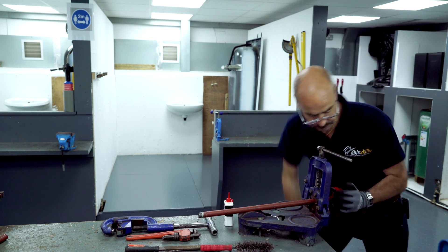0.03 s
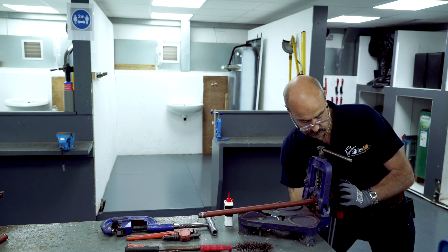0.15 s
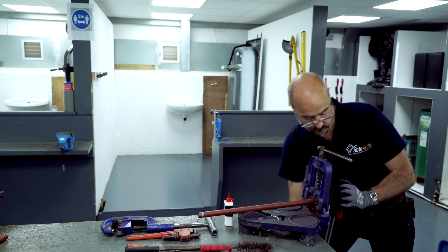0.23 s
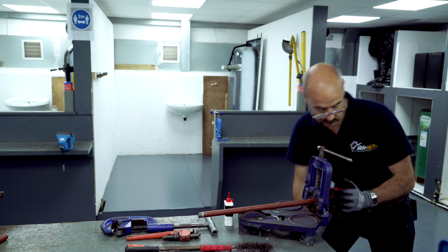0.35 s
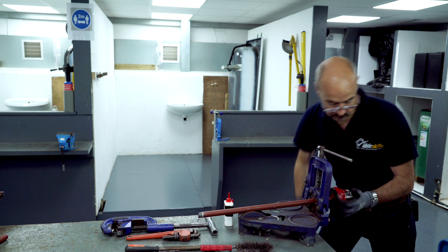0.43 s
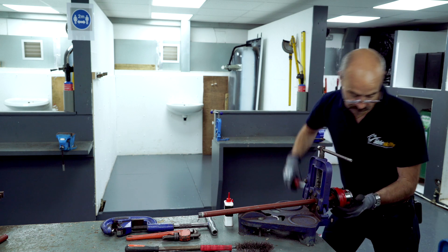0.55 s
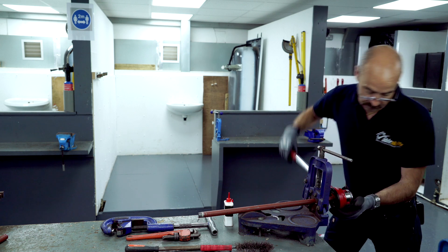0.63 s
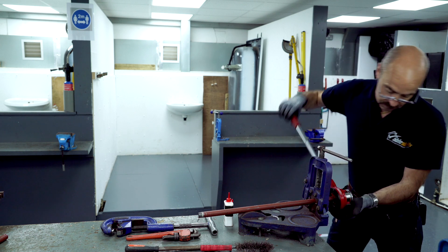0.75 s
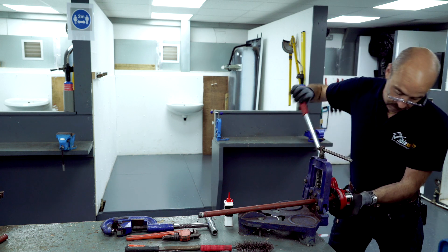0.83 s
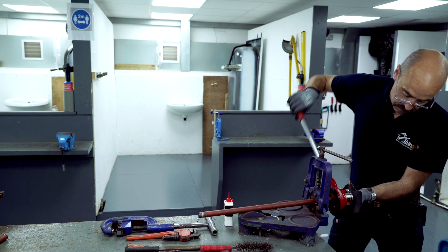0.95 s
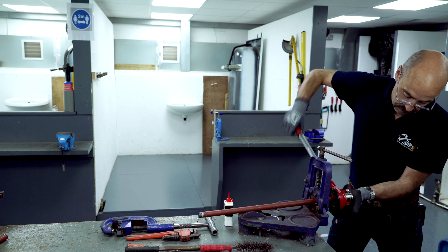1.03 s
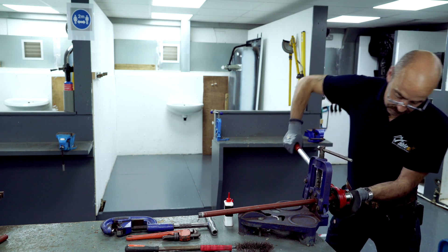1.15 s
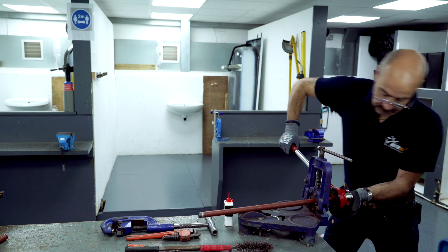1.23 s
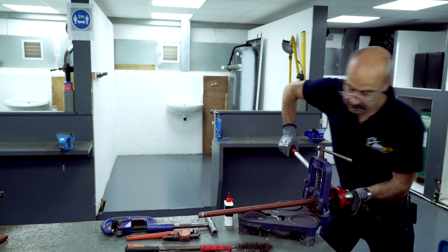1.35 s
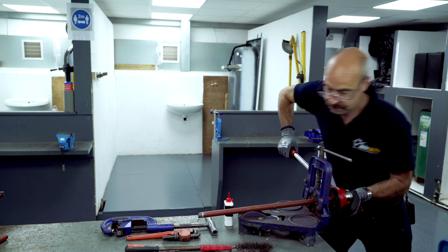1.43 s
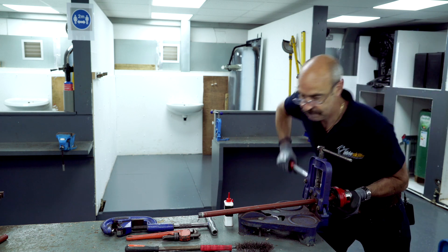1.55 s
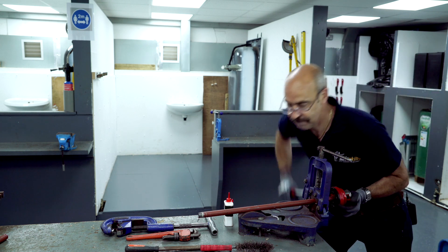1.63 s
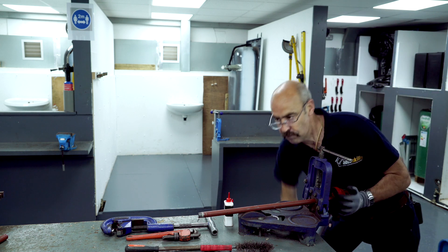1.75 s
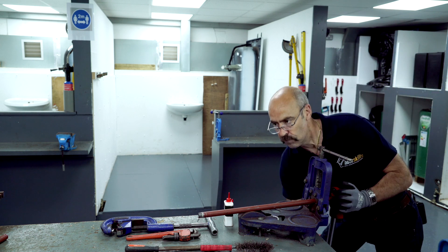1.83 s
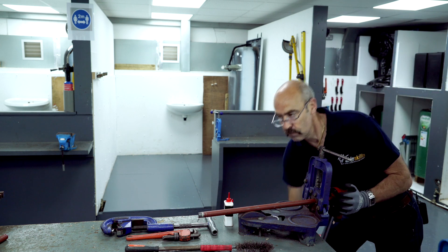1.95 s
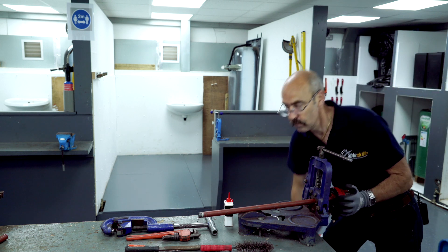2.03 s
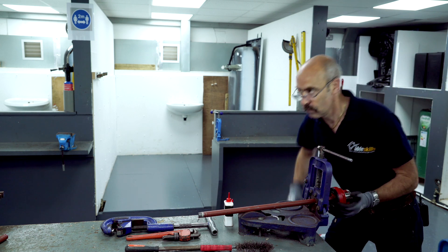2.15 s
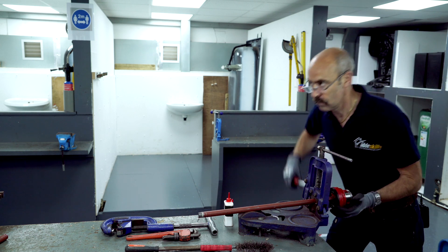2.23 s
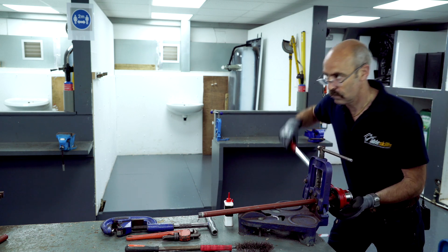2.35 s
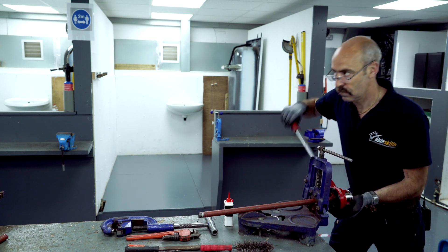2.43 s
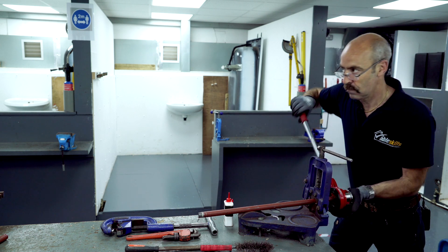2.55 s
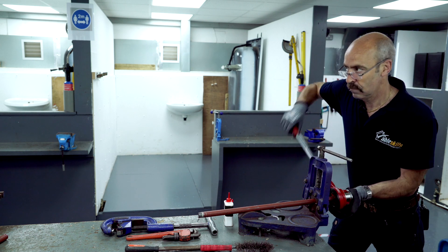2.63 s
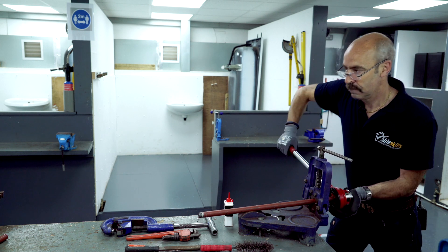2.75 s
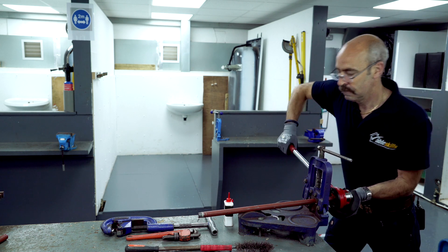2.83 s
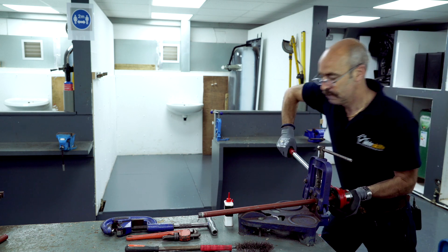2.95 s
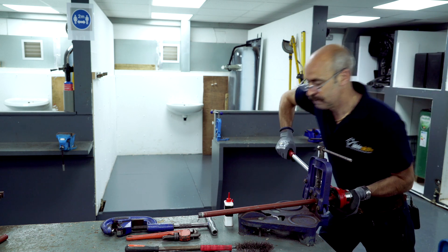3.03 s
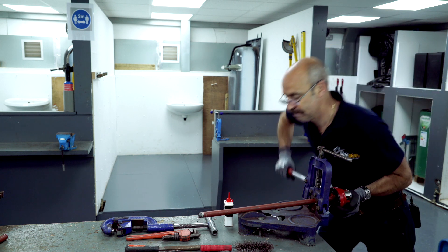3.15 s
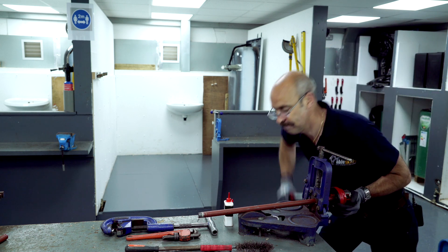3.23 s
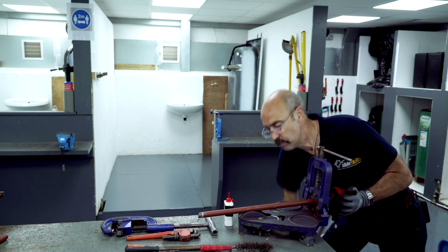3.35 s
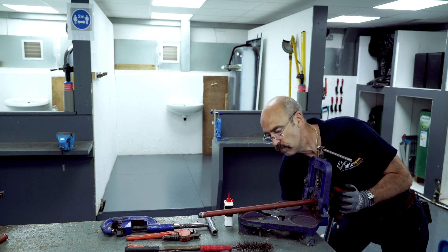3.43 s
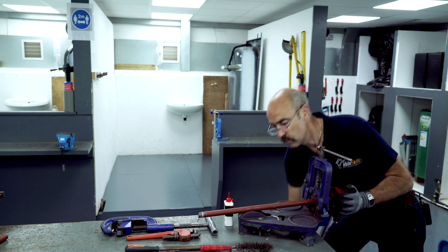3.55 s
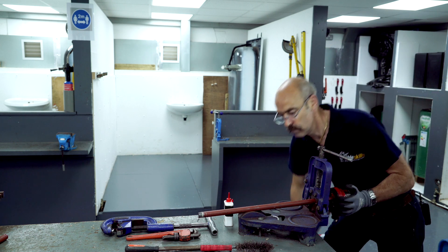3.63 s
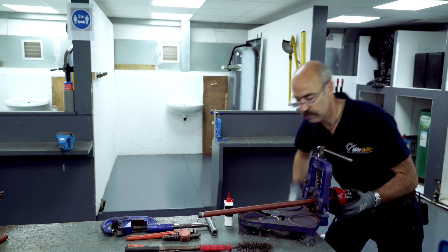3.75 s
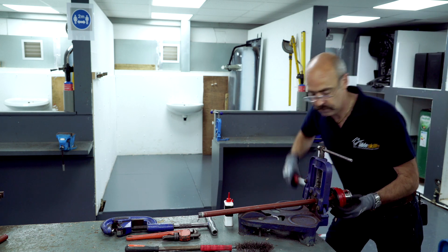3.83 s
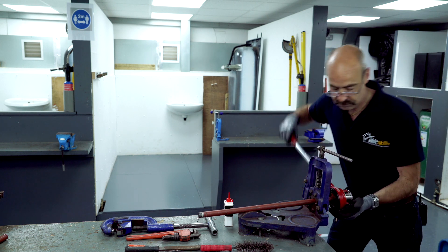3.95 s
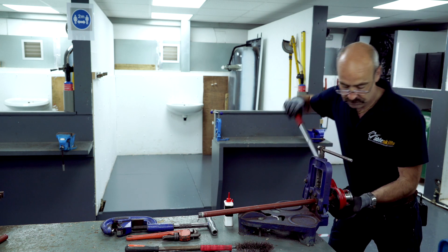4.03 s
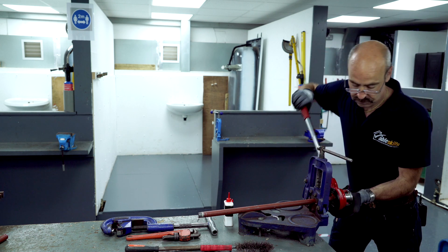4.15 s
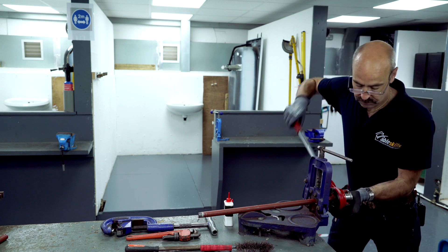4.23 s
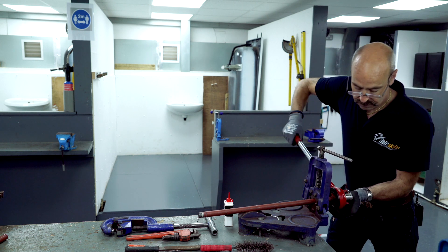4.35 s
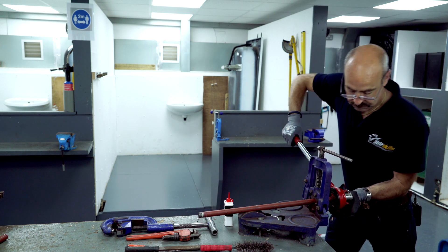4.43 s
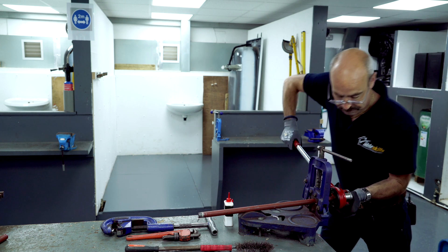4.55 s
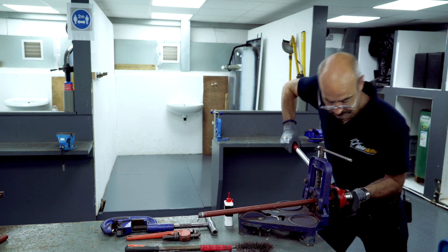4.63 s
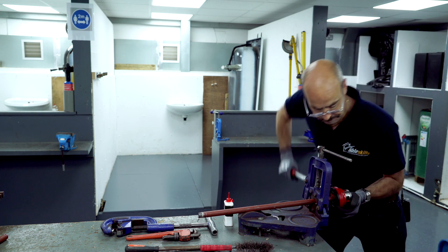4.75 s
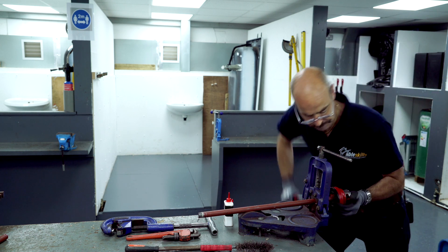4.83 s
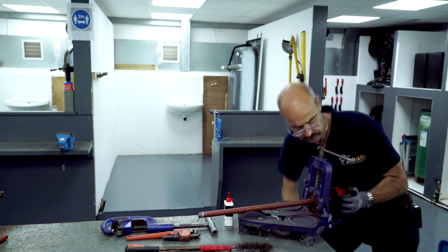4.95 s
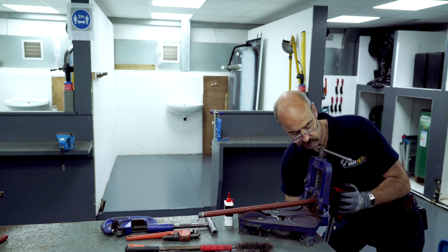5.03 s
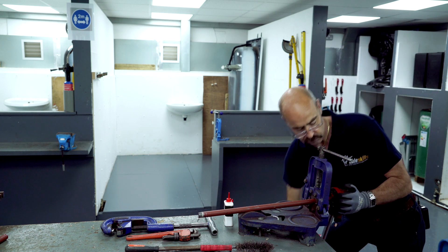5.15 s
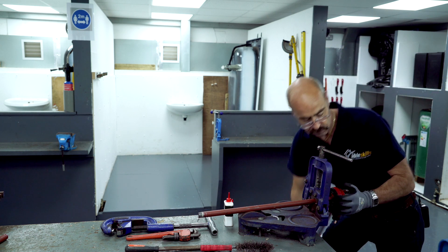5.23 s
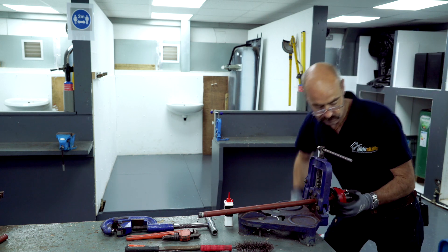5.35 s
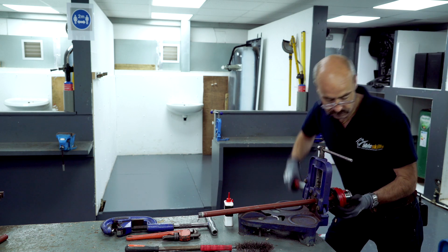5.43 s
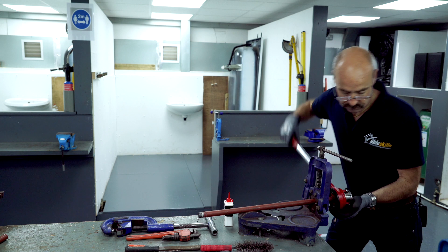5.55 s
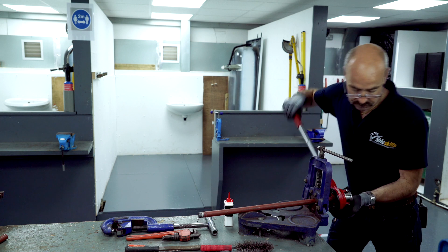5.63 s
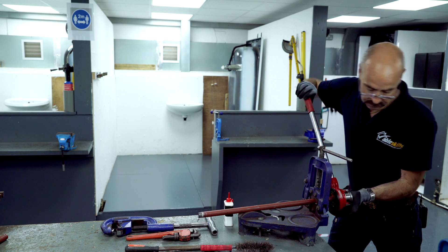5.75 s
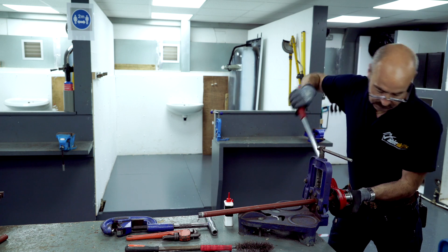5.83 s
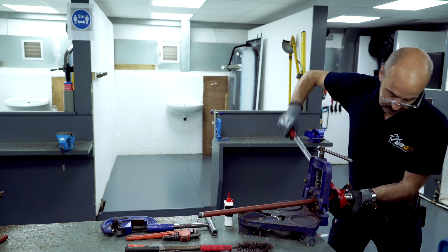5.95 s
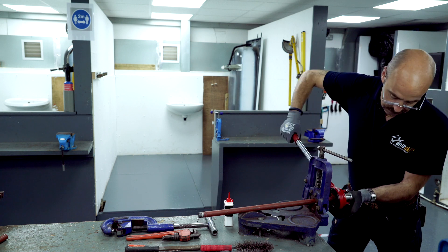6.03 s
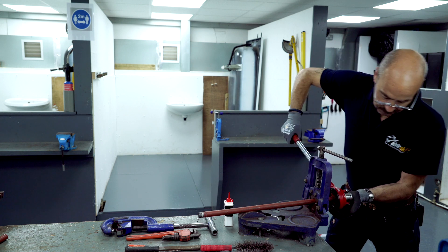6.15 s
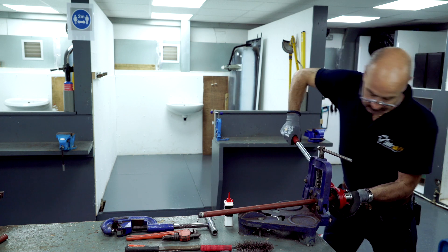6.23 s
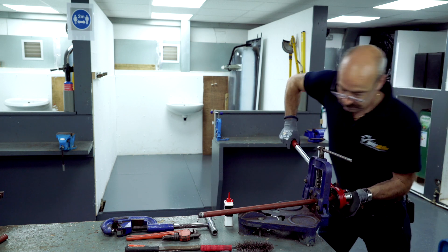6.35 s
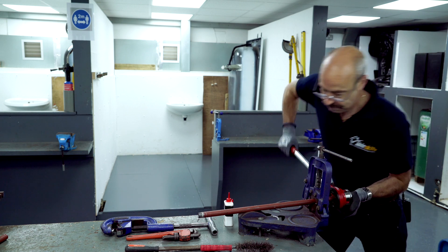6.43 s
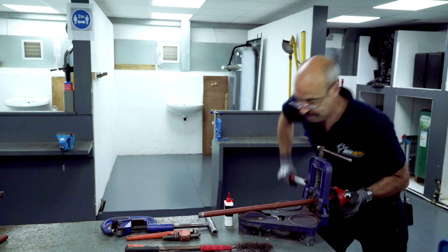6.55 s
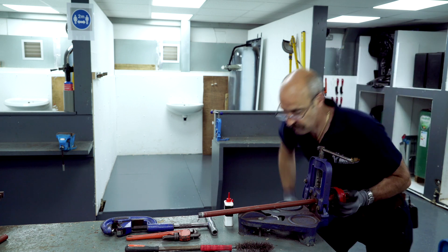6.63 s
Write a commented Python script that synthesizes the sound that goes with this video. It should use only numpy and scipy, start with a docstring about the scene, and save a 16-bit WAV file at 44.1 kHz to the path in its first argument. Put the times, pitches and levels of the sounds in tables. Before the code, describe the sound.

Loud steel ratchet clacks come in quick bursts of four, separated by loose handle knocks and quieter grinding scrapes as a pipe thread is cut.

```python
"""A ratchet die stock is worked on a steel pipe held in a stand vice in a hard-walled workshop.
A pull is already under way and is soon let go; the loose handle and stand knock as it turns round.
Four back strokes follow, each with four loud pawl snaps that ring the steel head (two add a faint fifth).
Friction noise scrapes and grinds in the pulls between; short bright noise ticks are scattered through all.
A last pull bites near the end; hiss, stand rumble, deep hum and a thin electrical whine lie below throughout."""
import sys
import numpy as np
from scipy import signal
from scipy.fft import rfft, irfft
from scipy.io import wavfile

SR = 44100
rng = np.random.default_rng(int(sys.argv[2]) if len(sys.argv) > 2 else 0)


def inscribe(sig):
    """Save sig as 16-bit PCM at rate SR to the path in sys.argv[1].

    A 1-D sig is mono; a 2-D sig holds one channel per row.
    Samples are clipped to [-1, 1] before scaling.
    """
    pcm = np.round(np.clip(np.atleast_2d(sig).T, -1, 1) * 32767)
    wavfile.write(sys.argv[1], SR, pcm.astype(np.int16))


def invert_db(level):
    """Linear amplitude ratio for a level in decibels (20 dB per decade), elementwise."""
    return 10 ** (np.asarray(level, dtype=float) / 20)


N = 295029


def rms_one(x):
    """Scale to unit rms."""
    return x / np.sqrt(np.mean(x ** 2) + 1e-20)


def in_time(rows):
    """Join curve rows by straight lines, one array per column; -120 outside the rows."""
    s, *columns = np.transpose(rows)
    return [np.interp(np.arange(N) / SR, s, c, left=-120, right=-120) for c in columns]


def drift(rate_hz):
    """Slow random wander of rms 1: noise through a double low-pass, made at every 40th sample."""
    r = np.exp(-80 * np.pi * rate_hz / SR)
    slow = signal.lfilter([1], [1, -2 * r, r * r], rng.standard_normal(N // 40 + 2002))
    slow = slow[2000:]     # skip the filter's start-up
    return np.interp(np.arange(N) / 40, np.arange(len(slow)), rms_one(slow))


def coloured(spectrum):
    """Noise of rms 1 shaped to the given relative dB per Hz."""
    hz, level_db = np.transpose(spectrum)
    log_hz = np.log(np.fft.rfftfreq(N, 1 / SR) + 1)
    gain = invert_db(np.interp(log_hz, np.log(hz), level_db))
    return rms_one(irfft(rfft(rng.standard_normal(N)) * gain, N))


def ring(x, hz, t60):
    """Two-pole resonator: a unit click sets a sine of height 1 ringing, 60 dB down after t60."""
    r, w = invert_db(-60 / (t60 * SR)), 2 * np.pi * hz / SR
    return signal.lfilter([0, np.sin(w)], [1, -2 * r * np.cos(w), r * r], x + 1e-18)


def band(x, low_hz, high_hz):
    """Band-pass."""
    edges_hz = [low_hz, min(high_hz, .45 * SR)]
    return signal.sosfilt(signal.butter(2, edges_hz, "band", fs=SR, output="sos"), x)


def dying(t60, rise_s, size):
    """A burst of noise that rises fast and dies away."""
    t = np.arange(size) / SR
    return rng.standard_normal(size) * (1 - np.exp(-t / rise_s)) * invert_db(-60 * t / t60)


def add(out, s, sound):
    """Mix a sound in at a time."""
    i = round(s * SR)
    out[i:i + len(sound)] += sound[:N - i]


# Pawl snaps. Each row: start in seconds, nominal level in dB, favoured head mode in Hz,
# stand thud and treble ring in dB against that level.
SNAP_ROWS = [(0.534, -1, 3180, -18, -2), (0.634, -4.5, 3680, -16, 2.5), (0.725, -5, 3290, -12, 0.5),
             (0.816, -7.5, 3708, -11.5, -3.5), (1.076, -13.5, 3110, -21, -12.5),
             (2.216, 2, 3309, -21, -5.5), (2.314, -4, 3690, -13, 0), (2.416, -1, 2960, -21.5, -5.5),
             (2.514, -2.5, 3336, -22, -3.5), (3.832, -1.5, 3400, -18.5, -5.5), (3.929, -5, 3697, -14.5, 1),
             (4.019, 1, 2986, -18.5, -6.5), (4.111, -1, 3234, -28, -1), (5.451, 2.5, 2808, -18, -8),
             (5.544, -3.5, 3827, -13.5, -3.5), (5.63, -3, 2770, -12, -2), (5.719, 0.5, 3234, -17, -5),
             (5.941, -17, 3200, -9.5, -9)]
# Steel modes of the die head. Each row: pitch in Hz, weight in dB, ring time t60 in seconds.
HEAD_MODES = [(555, 0, .04), (1100, -2, .03), (1290, 0, .03), (1650, -1, .02), (2170, -12, .02),
              (2530, -7, .02), (2780, -6, .02), (3050, -4, .022), (3180, -4, .05), (3300, -5, .03),
              (3450, -7, .02), (3700, -8, .02), (4250, -11, .012), (5450, -22, .04), (6350, -22, .012),
              (7500, -12, .012), (8120, -10, .012), (8780, 4, .018), (9250, -4, .012), (10050, -9, .01),
              (11700, -12, .012), (13050, -2, .022), (13650, -8, .012), (14260, -12, .012),
              (14800, -5, .02), (15270, -11, .01)]
# The four parts of a snap, low to high. Each row: crack band from Hz, to Hz, crack in dB,
# ringing echo in dB, plain echo in dB, echo t60 in seconds.
SNAP_PARTS = [(714, 4100, 15, -28.5, -22.5, 0.2), (2060, 3540, 12.5, -35, -17, 0.25),
              (7330, 10160, 6, -39.5, -28.5, 0.25), (12000, 13500, 9.5, -35.5, -28, 0.2)]
# Borders in Hz that deal the head modes out to the four parts.
MODE_BORDERS_HZ = [400, 1900, 5000, 11000, 16000]
BODY_DB, TOP_UNDER_TREBLE_DB = -8, 7   # second part against the snap; highest part below the treble ring


def pawl(size=12000):
    """Each snap cracks and rings the head; the walls return a dense dying echo, part through the same modes."""
    out, click = np.zeros(N), np.arange(size) == 0
    for s, snap_db, favoured_hz, thud_db, treble_db in SNAP_ROWS:
        slip = band(dying(0.06, 0.00087, size), 1200, 3000)     # the pawl slips off the crest first
        add(out, s - .011, invert_db(snap_db - 23.5) * slip)
        levels = thud_db, BODY_DB, treble_db, treble_db - TOP_UNDER_TREBLE_DB
        spans = zip(MODE_BORDERS_HZ, MODE_BORDERS_HZ[1:])
        for (low, high), part, level_db in zip(spans, SNAP_PARTS, levels):
            *crack_hz, crack_db, ringing_db, plain_db, echo_t60 = part
            blow = click + invert_db(ringing_db) * dying(echo_t60, 0.0009, size)
            crack = invert_db(crack_db) * dying(0.0085, 0.00055, size)
            plain_echo = invert_db(plain_db) * dying(echo_t60, 0.013, size)
            sound = band(crack + plain_echo, *crack_hz)
            for hz, mode_db, ring_s in HEAD_MODES:
                if not low <= hz < high:
                    continue
                # the seat of the tooth favours nearby modes
                near_db = 9 * np.exp(-((hz - favoured_hz) / 280) ** 2)
                seated_hz = hz * (1 + rng.normal(0, .005))     # the grip on the pipe detunes the head a little
                luck_db = rng.normal(0, 3.5)     # no two blows strike a mode alike
                gain = invert_db(mode_db + near_db + luck_db - 10) * rng.choice([-1, 1])
                sound += gain * ring(blow, seated_hz, ring_s)
            add(out, s, invert_db(snap_db + level_db) * sound)
    return out


# Knocks of handle and stand at the turn-rounds. Each row: moment in seconds, nominal level in dB,
# thud pitch in Hz, rattle weight in dB.
KNOCK_ROWS = [(0.37, -16.5, 570, -28), (0.419, -20.5, 344, -25), (0.453, -36, 334, -18),
              (0.461, -28, 511, -18), (0.469, -29.5, 325, -12), (0.998, -25.5, 613, -16),
              (1.081, -29, 580, -1), (1.101, -22, 606, -10.5), (1.132, -29, 890, -13),
              (1.169, -22, 643, -19.5), (1.199, -21, 1090, -19), (1.531, -50, 501, -17),
              (1.969, -34.5, 380, -22), (1.987, -31, 764, -17.5), (2.003, -26.5, 720, -21),
              (2.011, -22, 396, -41), (2.035, -22.5, 660, -15), (2.076, -26.5, 630, -16.5),
              (2.131, -18, 598, -34), (2.154, -24, 413, -11.5), (2.693, -21.5, 1150, -16.5),
              (2.746, -23, 606, -17.5), (2.783, -20, 454, -29.5), (3.149, -38, 530, -31),
              (3.601, -26.5, 675, -15.5), (3.637, -29, 444, -28), (3.653, -25, 388, -18),
              (3.672, -19.5, 570, -18), (3.685, -32, 596, -13), (3.695, -31, 377, -2),
              (3.717, -18, 346, -16), (3.766, -26, 380, -11.5), (4.27, -25.5, 670, -28),
              (4.297, -44.5, 640, 0), (4.349, -23.5, 665, -21), (4.365, -24.5, 358, -20.5),
              (4.707, -44.5, 790, -3), (5.215, -20, 463, -22), (5.288, -34.5, 582, -12.5),
              (5.296, -28, 328, -18), (5.321, -50, 310, 6), (5.349, -20.5, 584, -21.5),
              (5.367, -29.5, 644, -9.5), (5.393, -27, 523, -6), (5.801, -29, 454, -23),
              (5.892, -26.5, 650, -11), (5.907, -24.5, 860, -15), (6.026, -25.5, 570, -30)]
# the handle rebounds in its slack after every snap; its level is against the snap
REBOUND_S, REBOUND_DB, REBOUND_THUD_HZ, REBOUND_RATTLE_DB = 0.038, -28, 570, -4.5


def knocks(size=5000):
    """Loose contacts: a rough push thuds in the stand, a short tick rattles a few middle modes of the head."""
    out, middle = np.zeros(N), [hz for hz, *_ in HEAD_MODES if 1500 < hz < 3500]
    rebounds = []
    for s, snap_db, *_ in SNAP_ROWS:
        moment = s + REBOUND_S + rng.normal(0, .002)
        thud_hz = REBOUND_THUD_HZ * rng.uniform(.65, 1.6)
        rebounds.append((moment, snap_db + REBOUND_DB, thud_hz, REBOUND_RATTLE_DB))
    for s, knock_db, thud_hz, rattle_db in KNOCK_ROWS + rebounds:
        push, tick = dying(0.07, 0.0047, size), dying(0.024, 0.0003, size)
        thud = 0.064 * ring(push, thud_hz, 0.03) + band(push, 290, 1100)
        rung = sum(ring(tick, hz, 0.0058) for hz in rng.choice(middle, size=3))
        tail = invert_db(-14) * dying(0.23, 0.013, size)
        rattle = 0.092 * rung + 1.2 * tick + tail
        rattle = band(band(rattle, 730, 3500), 730, 7900)     # blunt contacts carry little treble
        add(out, s - .001, invert_db(knock_db) * (thud + 2.2 * invert_db(rattle_db) * rattle))
    return out


# Pulls on the handle. Each row: dies bite, hardest moment and let go in seconds,
# scrape in dB at the hardest, bite in dB against that.
PULL_ROWS = [(-.2, .13, 0.21, -42, -9.5), (1.6, 1.797, 1.895, -40, -13.5), (3.16, 3.367, 3.46, -43, -15.5),
             (4.715, 4.983, 5.08, -43.5, -10), (6.505, 6.722, 6.67, -44.5, -11.5)]
SCRAPE_TOP_DB = np.array(PULL_ROWS)[:, 3:4]
BITE_S, RELEASE_S = .05, .07   # ramp into the bite and ramp after letting go
LET_GO_DB, IDLE_DB = -7, -32   # effort against the hardest moment


def pulls():
    """Effort of each pull in dB: bite, build up to the hardest, ease to the let-go, drop away."""
    efforts = []
    for bite, hard, go, _, bite_db in PULL_ROWS:
        curve = [(bite - BITE_S, IDLE_DB), (bite, bite_db), (hard, 0), (go, LET_GO_DB), (go + RELEASE_S, IDLE_DB)]
        efforts.append(in_time(curve)[0])
    return np.array(efforts)


def swell(start, end, rise, fall):
    """0 dB from start to end, sloping away on both sides at so many dB per second."""
    t = np.arange(N) / SR
    return np.minimum(0, np.minimum(rise * (t - start), fall * (end - t)))


# Resonances the scrape excites in pipe and stand. Each row: pitch in Hz,
# spread in Hz (t60 is 4.3 / spread), weight per Hz of spread in dB.
PIPE_MODES = [(394, 73, -1), (537.5, 11.3, 3.5), (751, 146, -2.5), (891.6, 30, 2.5), (1090, 38, -2),
              (1268, 79, -2.5), (1510, 250, -30.5), (2044, 67, -8), (2410, 50, -20), (3620, 450, -24)]


def scrape():
    """Rough friction of the dies: flickering noise rings the pipe resonances, louder with effort."""
    scrape_db = np.max(SCRAPE_TOP_DB + pulls(), axis=0)
    rub = rng.standard_normal(N) * invert_db(1.4 * drift(40) + 2.3 * drift(210))
    rung = np.zeros(N)
    for k, (hz, spread, level_db) in enumerate(PIPE_MODES):
        mode = rms_one(ring(rub, hz, 4.3 / spread)) * np.sqrt(spread)
        rung += (-1) ** k * invert_db(level_db + 3.5 * drift(6.2)) * mode
    rough = rms_one(rms_one(rung) + 0.354 * rms_one(band(rub, 380, 1900)))
    return invert_db(scrape_db) * rough


# Colour of the bright grind and the slide. Each row: frequency in Hz, relative level in dB per Hz.
GRIND_COLOUR = [(1470, -27.5), (2500, -17), (3180, -9.5), (3720, 3), (7650, -1), (8530, 0.5), (15000, -8.5),
                (16000, -9)]
# Back strokes. Each row: start and end in seconds, stand rumble in dB, pawl slide hiss in dB.
RETURN_ROWS = [(0.379, 1.21, -49, -47.5), (1.989, 2.81, -50.5, -52.5), (3.635, 4.423, -47.5, -48.5),
               (5.274, 6.05, -48.5, -49.5)]
GRIND_DB, GRIND_FOLLOWS = -15, 1.1   # grind against the scrape; how steeply it follows effort
FASTEST_AFTER_S = .37   # the swing is fastest so long after its start
SLIDE_RISE_DB_PER_S, SLIDE_FALL_DB_PER_S = 117.5, 69.5


def grind_and_slide():
    """One bright noise serves the cutting edges under effort and the pawl sliding on the back stroke."""
    grind_db = np.max(SCRAPE_TOP_DB + GRIND_DB + GRIND_FOLLOWS * pulls(), axis=0)
    slides = []
    for s, _, _, hiss_db in RETURN_ROWS:
        fastest = s + FASTEST_AFTER_S
        slides.append(hiss_db + swell(fastest, fastest, SLIDE_RISE_DB_PER_S, SLIDE_FALL_DB_PER_S))
    slide_db = np.max(slides, axis=0)
    level = invert_db(grind_db + drift(60)) + invert_db(slide_db)
    return level * coloured(GRIND_COLOUR)


# The louder bright ticks, in the pulls and between them. Each row: start in seconds,
# nominal level in dB, pitch in Hz.
TICK_ROWS = [(0.9723, -46.5, 8810), (1.0872, -28, 8620), (1.0954, -39, 13920), (1.1778, -44, 7500),
             (1.8598, -37.5, 12060), (1.9837, -44.5, 9780), (2.0357, -47, 8760), (2.7025, -39, 9300),
             (3.1675, -48.5, 13730), (3.4382, -47, 8600), (3.6063, -43, 9370), (4.2666, -46, 8720),
             (4.3575, -41, 13480), (4.6998, -46, 8460), (4.7107, -40, 8500), (4.7554, -49, 10930),
             (4.826, -44, 11130), (4.8746, -43, 7950), (4.9214, -36.5, 14810), (4.9351, -43, 7250),
             (4.9709, -43, 11000), (4.9841, -39, 11540), (4.992, -40, 14360), (5.037, -40.5, 10600),
             (5.1228, -46, 10500), (5.2153, -40, 7400), (6.0158, -44, 9600), (6.174, -44.5, 9900),
             (6.5375, -46.5, 14560)]
SMALL_TICK_DB = -51.5   # nominal level of the faintest random ticks


def ticks(size=1500, count=6):
    """Tiny bright bursts of band-passed noise; a few faint ones fall at random in every pull."""
    out, small = np.zeros(N), []
    for bite, _, go, *_ in PULL_ROWS:
        for u, v, w in rng.random((count, 3)):
            small.append((bite + u * (go - bite), SMALL_TICK_DB + 6 * v, 7500 * 1.9 ** w))
    for s, tick_db, hz in TICK_ROWS + [tick for tick in small if 0 < tick[0] < N / SR]:
        burst = band(dying(0.021, 0.00035, size), .72 * hz, 1.3 * hz)
        add(out, s, invert_db(tick_db + 0.5) * burst)
    return out


# Colour of the stand rumble. Each row: frequency in Hz, relative level in dB per Hz.
STAND_COLOUR = [(71, -44), (120, 3), (386, 1.5), (479, 0.5), (531, -1.5), (1000, -7), (1090, -12),
                (1260, -12.5), (2500, -18), (3250, -25.5), (5500, -120)]
# Colour of the deep hum. Each row: frequency in Hz, relative level in dB per Hz.
DEEP_COLOUR = [(15, -46), (30, -22.5), (45, -12.5), (62, 4), (125, -4), (170, -26), (290, -89)]
SHAKE_RISE_DB_PER_S, SHAKE_FALL_DB_PER_S, REST_DB = 240, 47.5, -63   # REST_DB: floor of the rumble
PULL_RUMBLE_DB = -7.5   # stand rumble against the scrape
DEEP_DB, DEEP_PULL_DB, DEEP_WAVER_DB = -62, 10, 2   # hum at rest, its gain under full effort, its waver


def stand():
    """The stand rumbles in every back swing and pull; a deep wavering hum swells with effort."""
    effort_db = pulls()
    swings = [level_db + swell(start, end, SHAKE_RISE_DB_PER_S, SHAKE_FALL_DB_PER_S)
              for start, end, level_db, _ in RETURN_ROWS]
    under_pulls = SCRAPE_TOP_DB + PULL_RUMBLE_DB + effort_db
    rumble_db = np.max([*swings, *under_pulls], axis=0).clip(REST_DB)
    deep_db = DEEP_DB + DEEP_PULL_DB * invert_db(effort_db.max(axis=0)) + DEEP_WAVER_DB * drift(7)
    rumble = invert_db(rumble_db + 3.8 * drift(6.3)) * coloured(STAND_COLOUR)
    return rumble + invert_db(deep_db) * coloured(DEEP_COLOUR)


# Colour of the room hiss. Each row: frequency in Hz, relative level in dB per Hz.
HISS_COLOUR = [(600, -30), (1000, 0), (2000, -7), (4000, -12), (8000, -15), (15500, -18), (16400, -30)]


def hiss():
    """Steady room hiss: coloured noise at -68 dB rms."""
    return invert_db(-68) * coloured(HISS_COLOUR)


def whine():
    """Thin electrical whine: a 15630 Hz sine near -77 dB rms whose level wavers slightly."""
    level = np.sqrt(2) * invert_db(-77 + 0.52 * drift(8))
    return level * np.sin(2 * np.pi * 15630 * np.arange(N) / SR)


def scene():
    """All sources summed into one channel."""
    work = pawl() + knocks() + scrape() + grind_and_slide() + ticks()
    return (work + stand() + hiss() + whine())[None]


def band_limit(x):
    """A steep low-pass at the top of the band."""
    return signal.sosfilt(signal.butter(12, 16470, fs=SR, output="sos"), x)


def record(dry):
    """Peaks are clipped at full scale."""
    mix = np.clip(dry, -1, 1)
    return band_limit(mix)


dry = scene()
out = record(dry)
inscribe(out)
```